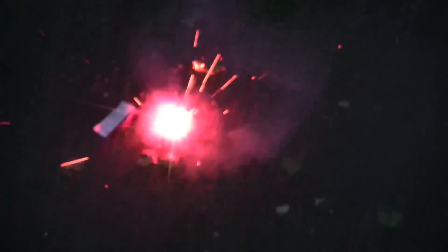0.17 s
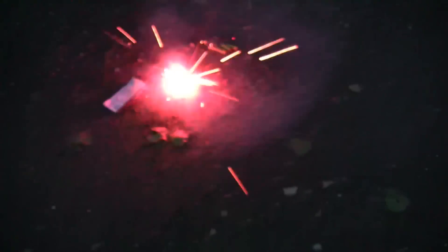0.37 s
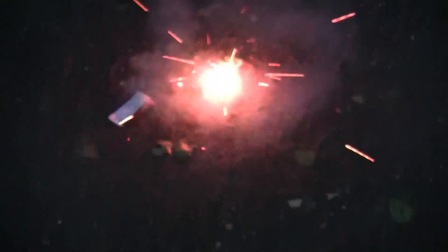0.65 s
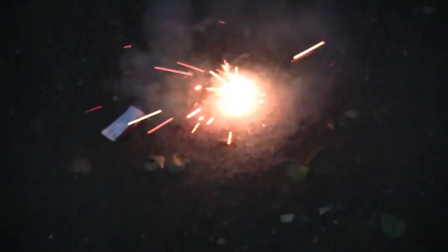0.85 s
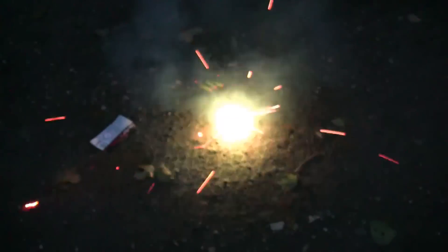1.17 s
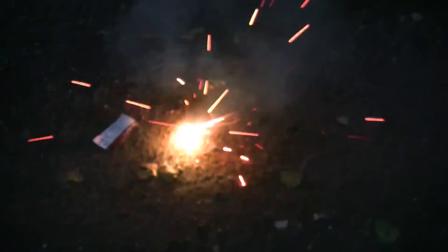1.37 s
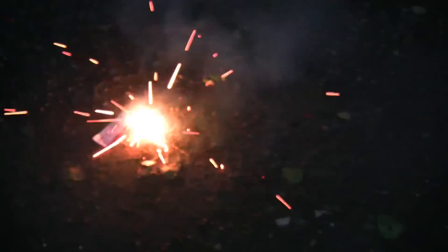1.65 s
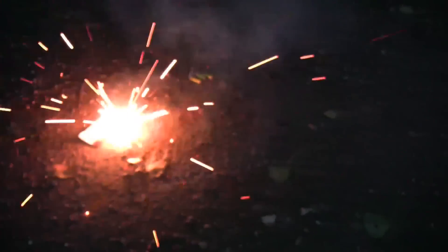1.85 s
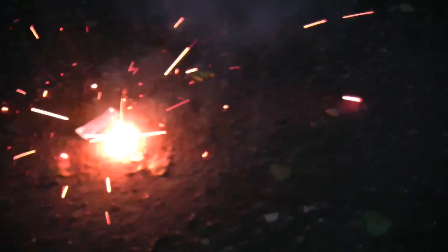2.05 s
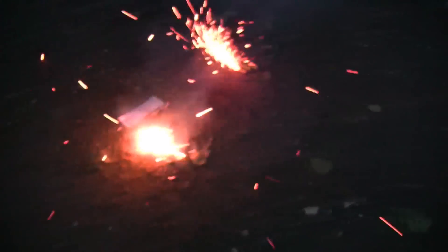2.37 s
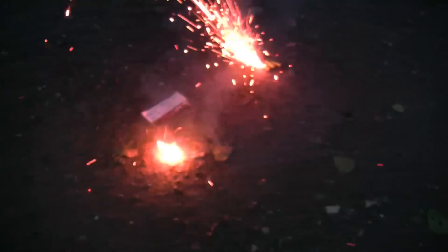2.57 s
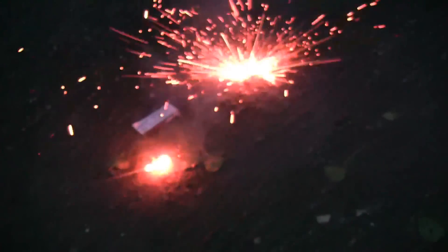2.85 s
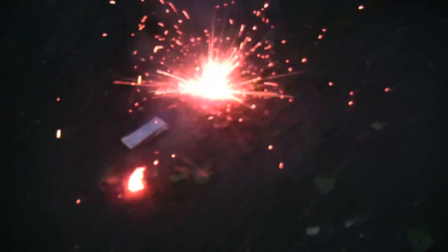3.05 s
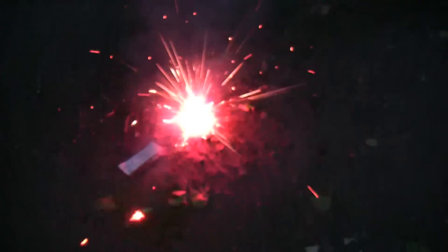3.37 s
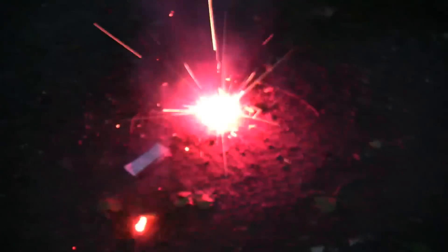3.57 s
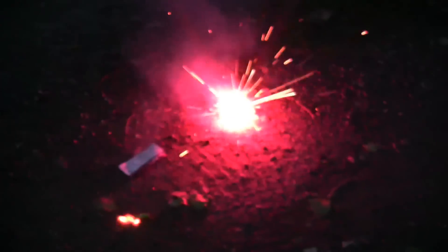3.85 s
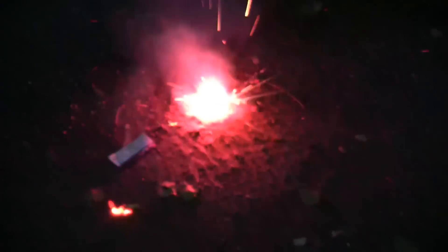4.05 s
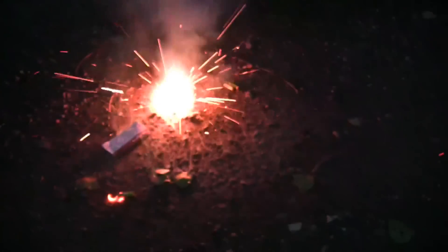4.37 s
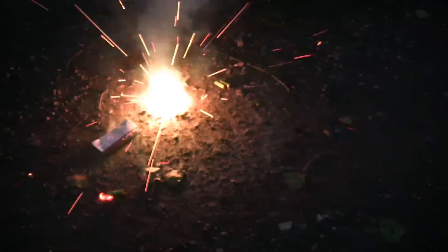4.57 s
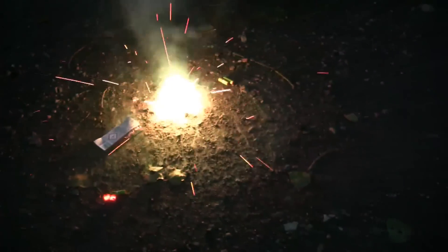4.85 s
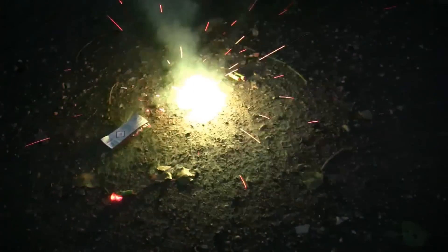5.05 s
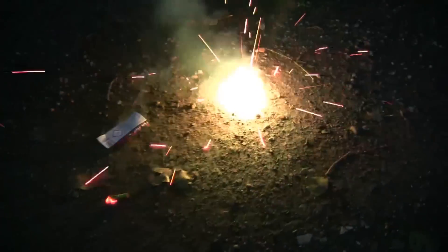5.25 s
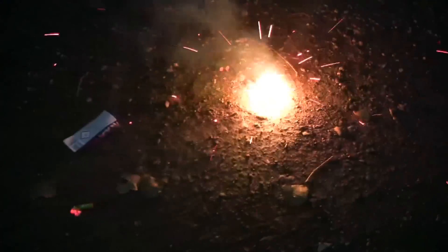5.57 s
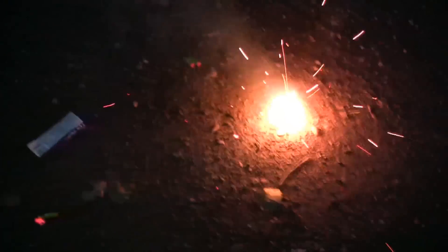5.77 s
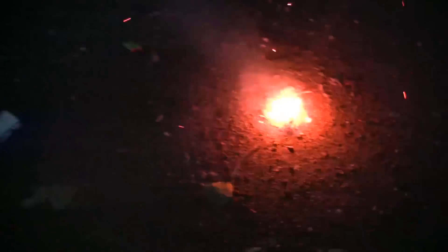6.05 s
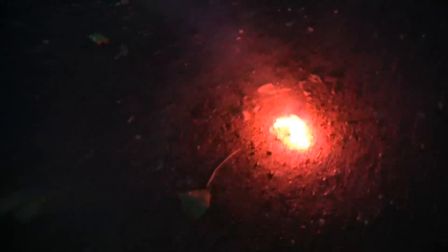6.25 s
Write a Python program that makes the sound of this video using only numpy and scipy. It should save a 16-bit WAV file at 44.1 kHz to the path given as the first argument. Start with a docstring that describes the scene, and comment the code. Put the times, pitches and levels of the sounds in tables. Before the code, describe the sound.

A ground spinner firework hisses and crackles on asphalt, with a fluttering roar, a low wavering hum and sharp pops.

```python
"""A ground spinner firework whirls on asphalt outdoors, a couple of metres from a hand-held phone.
Its nozzle jet hisses and crackles, and the whirling tube hums at its turning rate. The charge burns
unevenly, chuffing in bouts of quick gas puffs and letting off sharp pops; three times the nozzle clears
with a swoosh. Near the end the jet loses its edge and turns into a sputtering roar."""
import sys
import numpy as np
from scipy import signal
from scipy.fft import rfft, irfft, next_fast_len
from scipy.io import wavfile
from scipy.ndimage import uniform_filter1d

SR = 44100
rng = np.random.default_rng(int(sys.argv[2]) if len(sys.argv) > 2 else 0)


def to_wav(sig):
    """Store sig (one row per channel, or 1-D mono) as 16-bit WAV at the path in sys.argv[1].

    Samples outside -1..1 are clipped; the rate is SR.
    """
    pcm = np.clip(np.atleast_2d(sig), -1, 1) * 32767
    pcm = np.round(pcm).astype(np.int16)
    wavfile.write(sys.argv[1], SR, pcm.T)  # frames by channels


N = 282813

# tone colours of the jet's hiss, the flame's roar and a gas puff: frequency_hz, gain_db
HISS_EQ = [(2800, -28.5), (4300, -7.5), (5400, 0.5), (6600, -1), (7400, -4), (8200, -12.5), (10000, -30)]
ROAR_EQ = [(25, -36), (60, -16.5), (120, -8), (230, -0.5), (310, -1), (420, -5), (540, -0.5), (800, -1.5),
           (1400, -0.5), (2300, -1.5), (3200, -9.5), (6000, -39)]
PUFF_EQ = [(25, -41), (60, -17.5), (95, -8.5), (135, -3), (185, 0), (255, 1), (330, -6), (420, -8.5),
           (700, -7.5), (980, -17.5), (1400, -16), (4000, -32), (12000, -46)]
# bouts of uneven burning: start_s, end_s, surge_db, puff_rate_hz
CHUFF_BOUTS = [(0, 0.111, -33, 95.2), (0.126, 0.387, -29.5, 105), (0.533, 0.617, -28.5, 101.9),
               (.801, 0.855, -28.5, 99), (1.039, 1.096, -29, 95), (1.109, 1.171, -31.5, 87.9),
               (1.184, 1.25, -26, 90.9), (1.471, 1.518, -29.5, 89.88), (1.665, 1.87, -29.5, 75.05),
               (2, 2.089, -28, 73), (2.2, 2.282, -29.5, 76.03), (2.38, 2.721, -31.5, 79.97),
               (2.84, 3.32, -37, 87.1), (3.45, 3.52, -36.5, 94.1), (3.735, 3.771, -36, 98.15),
               (3.879, 3.926, -35, 99.6), (4.139, 4.165, -35.5, 104), (4.221, 4.34, -36.5, 106.1),
               (4.454, 4.485, -28.5, 110.1), (4.595, 4.78, -37.5, 105), (4.86, 5.001, -34.5, 96.9),
               (5.13, 5.156, -28, 90), (5.56, 5.58, -36, 80), (5.611, 5.672, -31.5, 75.1),
               (5.703, 5.729, -33, 75), (5.909, 5.972, -37, 69.9), (6.05, 6.12, -35.5, 70),
               (6.19, 6.26, -29.5, 70), (6.28, 6.366, -33, 65.1)]
FULL_BOUT_DB = -25  # the surge that counts as a full bout
FULL_SPIN_HZ = 135.4


def undb(db):
    """Decibels to gain."""
    return 10 ** (np.asarray(db) / 20)


def unit(x):
    """Scale to rms 1."""
    return x / np.sqrt(np.mean(x ** 2))


def curves(table):
    """Automation lanes: each column after the first, joined by straight lines in time."""
    times_s, *columns = np.transpose(table)
    return [np.interp(np.arange(N) / SR, times_s, column) for column in columns]


def colour(x, eq):
    """Causal EQ through (frequency_hz, gain_db) points, falling 10 dB an octave beyond both ends."""
    size = 2 * next_fast_len(N // 2 + 4096)
    hz, db = np.transpose(eq)
    octave = np.log2(np.maximum(np.arange(size // 2 + 1) * SR / size, 10))
    knots = np.log2(hz)
    beyond = abs(octave - np.clip(octave, knots[0], knots[-1]))
    cepstrum = irfft(np.log(undb(np.interp(octave, knots, db) - 10 * beyond)))
    cepstrum[1:size // 2] *= 2  # fold to minimum phase
    cepstrum[size // 2 + 1:] = 0
    return irfft(rfft(x, size) * np.exp(rfft(cepstrum)))[..., :N]


def walk(hz):
    """Random wandering with spread 1, up to about hz changes a second."""
    pole = np.exp(-2 * np.pi * hz / SR)
    return unit(signal.lfilter([1], [1, -2 * pole, pole ** 2], rng.standard_normal(N)))


def decay(kicks, life_s):
    """Each kick dies away exponentially."""
    return signal.lfilter([1], [1, -np.exp(-1 / (life_s * SR))], kicks)


def burning_grains(per_s, spread_db, life_s):
    """Power of burning grains: each flares at a random moment and dies away; mean 1."""
    ignites = rng.random(N) < per_s / SR
    size = undb(spread_db * np.minimum(rng.exponential(size=N), 4))
    power = decay(ignites * size ** 2, life_s)
    return power / power.mean()


def eddies(drive, eq, graininess):
    """Jet noise of one eddy size, riding the drive with its own flicker and grains; mid and side."""
    grains = burning_grains(per_s=900, spread_db=3.0, life_s=0.00068)
    strength = drive * np.sqrt(1 + graininess * grains) * undb(walk(73))
    return unit(colour(rng.standard_normal((2, N)) * strength, eq))


def jet_hiss(throb, flare, flutter, chuffing, hiss_dip_db=1.95, skirt_lift_db=5):
    """The nozzle jet, rough with burning grains; the hiss dips and dulls in each bout; mid and side."""
    # the jet's level, and its low and high bands against it: time_s, hiss_db, skirt_db, sizzle_db
    jet_levels = [(0, -24.5, -6.5, 1), (0.45, -23.0, -6.5, 0), (0.85, -25.5, -6.5, -1), (1.4, -21, -7, -2),
                  (1.95, -24, -3.5, -0.5), (2.45, -23, -4.5, -2.5), (2.7, -20, -6, -3.5),
                  (3.05, -26.5, -6, 1.0), (3.5, -27.5, -4.5, 4.0), (3.72, -20.5, -8.5, -1.5),
                  (4.1, -23.5, -6.5, 1.0), (4.75, -22, -5, -2.0), (5.25, -20.5, -5, -4.5),
                  (5.75, -21.5, -4, -4.5), (6.1, -25.5, -2, -6.5), (6.28, -27, -2, -10.5),
                  (6.41, -35, 0, -8.5)]
    # the bands below and above the core of the hiss: frequency_hz, gain_db
    skirt_eq = [(1300, -21), (2300, -2.5), (3000, -1.5), (4000, -0.5), (4700, -2), (6000, -22.5)]
    sizzle_eq = [(6500, -16), (8200, -3), (9400, 0), (10800, 0.5), (12500, -5), (14500, -4.5),
                 (16000, -10.5)]
    hiss_db, skirt_db, sizzle_db = curves(jet_levels)
    drive = throb * np.sqrt(1 + 0.01 * flare / flare.mean()) * undb(0.77 * flutter + 0.36 * walk(7))
    # sparks spit mostly in the treble
    spit = np.sqrt(1 + 0.3 * burning_grains(per_s=700, spread_db=3.5, life_s=0.00078))
    skirt = eddies(drive, skirt_eq, graininess=1.0) * undb(skirt_db + skirt_lift_db * chuffing)
    core = eddies(drive * spit, HISS_EQ, graininess=0.64)
    sizzle = eddies(drive * spit, sizzle_eq, graininess=0.58) * undb(sizzle_db + 1.47)
    return (skirt + core + sizzle) * undb(hiss_db - hiss_dip_db * chuffing)


def flame_roar(throb, flare, flutter, reflection_gain=0.21):
    """The flame's low turbulence, ragged and full of small shock cracks; each puff adds a spurt."""
    # the flame's swell, rising in the tube's leap near 3 s and as the charge runs out: time_s, level_db
    flame_swell = [(0, -32), (.75, -36.5), (2.1, -31), (2.5, -28), (3.1, -27.5), (3.25, -33.5),
                   (4.3, -35.5), (5.1, -31.5), (5.23, -38.5), (5.6, -30.5), (5.95, -30), (6.1, -25),
                   (6.355, -23), (6.375, -36.5), (6.4, -22)]
    # an early reflection hollows the roar; in the leap its path shortens and a throaty note rises:
    # time_s, delay_ms, note_db
    reflection = [(2.75, 1.56, -51), (2.88, 1.95, -31), (3, 1.58, -36), (3.09, 1.42, -30),
                  (3.19, 1.42, -38), (3.3, 1.6, -67)]
    (swell_db,) = curves(flame_swell)
    delay_ms, note_db = curves(reflection)
    grains = burning_grains(per_s=150, spread_db=2.5, life_s=0.0039)
    ragged = unit(np.sqrt(0.7 + grains) * throb * undb(0.8 * flutter))
    strength = np.sqrt((ragged * undb(swell_db + 2.5)) ** 2 + undb(-5.5) * flare)
    cracks = (rng.random(N) < 500 / SR) * undb(3.4 * rng.standard_normal(N))
    gas = colour((rng.standard_normal(N) + undb(-7.5) * unit(cracks)) * strength, ROAR_EQ)
    n = np.arange(N)
    hollowed = gas + reflection_gain * np.interp(n - delay_ms * SR / 1000, n, gas)
    note = unit(walk(170) * np.cos(2 * np.pi * np.cumsum(1000 / delay_ms) / SR))
    return unit(hollowed) * np.sqrt(np.mean(strength ** 2)) + note * ragged * undb(note_db)


def puff_train(rate_sag=0.0801):
    """One kick of gas per cycle of the unsteady flame, slowing through each bout, loose in time and size."""
    # how unevenly the puffs come: time_s, timing_spread_periods, size_spread_db
    puff_scatter = [(1.25, .055, 2.5), (1.7, 0.12, 1), (2.6, 0.201, 2.5)]
    rate_points = []
    for start_s, end_s, _, hz in CHUFF_BOUTS:
        rate_points += [(start_s, hz * (1 + rate_sag)), (end_s, hz * (1 - rate_sag))]
    (rate_hz,) = curves(rate_points)
    timing_spread, size_spread_db = curves(puff_scatter)
    due = np.flatnonzero(np.diff(np.floor(np.cumsum(rate_hz) / SR)))
    timing_draw, size_draw = rng.standard_normal((1000, 2))[:len(due)].T
    onsets = np.clip(due + timing_draw * timing_spread[due] * SR / rate_hz[due], 0, N - 1).astype(int)
    train = np.zeros(N)
    train[onsets] = undb(size_spread_db[due] * size_draw) * np.sqrt(rate_hz.mean() / rate_hz[due])
    return train


def bout_surge(edge_s=0.03, rest_db=-52, stray_db=4.0):
    """The puffs' envelope: it swells into each bout, wavers and sinks; faint strays come between."""
    gain = undb(rest_db + stray_db * walk(9))
    for start_s, end_s, surge_db, _ in CHUFF_BOUTS:
        gain[int(start_s * SR):int(end_s * SR)] = undb(surge_db)
    edge = int(edge_s * SR)
    return uniform_filter1d(uniform_filter1d(gain, edge), edge) * undb(1.13 * walk(17))


def spin_hum(turn, spin_hz, chuffing, full_spin_db=-44, db_per_octave=15, bout_lift_db=4.5):
    """The jet pushes the air in a circle: a tone at the turning rate, roughened by unsteady thrust."""
    phase = turn + 0.27 * walk(18)
    overtone, undertone = np.sin(2 * phase), np.sin(0.75 * phase)
    tone = np.sin(phase) + undb(-11) * (overtone + undertone)
    level_db = full_spin_db + db_per_octave * np.log2(spin_hz / FULL_SPIN_HZ) + bout_lift_db * chuffing
    return unit(tone * undb(1.6 * walk(18))) * undb(level_db)


def charge_pops(crack_s=0.00055, bark_s=0.0011):
    """Lumps of the charge go off: each a short bright crack, and a bark of gas on top of a low thump."""
    # each pop's kick, and its low end against that: start_s, kick_db, low_end_db
    pop_cues = [(.143, -9, -4), (.160, -3, -7), (.357, -9.5, 2), (1.065, 1, -11), (1.493, -11, 1),
                (1.777, -9, 3), (2.567, -10, -3), (2.892, -6, 1), (3.085, -9, -2), (3.194, -12, 1),
                (3.243, -11, -18), (4.013, -11, -24), (4.977, -9, 1), (5.647, -9, -6), (6.218, -4, -8),
                (6.332, -14.5, 4)]
    high_kicks, low_kicks = np.zeros((2, N))
    for start_s, kick_db, low_end_db in pop_cues:
        high_kicks[int(start_s * SR)] = undb(kick_db)
        low_kicks[int(start_s * SR)] = undb(kick_db + low_end_db)
    crack = colour(decay(high_kicks, crack_s) * rng.standard_normal(N), HISS_EQ)
    bark = colour(decay(low_kicks, bark_s) * rng.standard_normal(N), ROAR_EQ)
    thump = colour(low_kicks, PUFF_EQ)
    return undb(5.5) * crack + undb(6.5) * bark + undb(20) * thump


def nozzle_swooshes(high_hz=6300, low_hz=3100, width_hz=770, edge_s=0.015):
    """The nozzle clears after a bout: a broad resonance of the jet swoops down and back up."""
    # moments when the nozzle clears: start_s, length_s, level_db
    swoosh_cues = [(1.255, .235, -27), (5.14, .19, -26), (5.46, .12, -30)]
    gain, centre_hz = np.zeros(N), np.full(N, float(high_hz))
    t = np.arange(N) / SR
    for start_s, length_s, level_db in swoosh_cues:
        arch = np.sin(np.pi * np.clip((t - start_s) / length_s, 0, 1))
        centre_hz -= (high_hz - low_hz) * arch
        gain += undb(level_db) * np.clip(np.minimum(t - start_s, start_s + length_s - t) / edge_s, 0, 1)
    phase = 2 * np.pi * np.cumsum(centre_hz) / SR
    return unit(walk(width_hz) * np.cos(phase) + walk(width_hz) * np.sin(phase)) * gain


def microphone_ports(mid, jet_side):
    """The phone's two ports resonate a little differently, so level and phase part in the treble."""
    # stereo width of the hiss: frequency_hz, side_gain_db
    side_eq = [(4200, -77), (5800, -24), (7000, -3.5), (8200, -4), (9600, -11), (11000, -13.5),
               (13000, -3.5), (15500, -11)]
    # tilt between the ports: frequency_hz, left_minus_right_db
    port_balance = [(4000, 0), (6400, 0.5), (8000, -3.5), (9800, 4.5), (11500, 1.5), (15000, 0)]
    # phase between the ports: frequency_hz, left_lead_rad
    port_phase = [(6700, 0), (8100, 0.88), (8700, 0.097), (10200, 0), (12200, -0.1), (12800, -1.1),
                  (13600, -.4), (15600, 0)]
    side = colour(jet_side, side_eq)
    hz = np.arange(N // 2 + 1) * SR / N
    balance = undb(np.interp(hz, *np.transpose(port_balance)))
    lead_rad = np.interp(hz, *np.transpose(port_phase))
    half_tilt = np.sqrt(balance) * np.exp(0.5j * lead_rad)
    return np.array([irfft(rfft(mid + side) * half_tilt, N), irfft(rfft(mid - side) / half_tilt, N)])


def scene():
    """One small tube makes every layer; its spin and uneven burn tie them together."""
    # the tube's whirl, slowing in its leap near 3 s and as the charge runs out: time_s, spin_hz
    spin_curve = [(0, 108), (.7, 134), (1.05, 134), (1.3, 114), (1.45, 122), (1.65, 112), (2, 134),
                  (2.6, 82), (2.92, 52), (3.27, 108), (3.45, 128), (3.7, 125), (4.25, 149), (4.9, 134),
                  (5.3, 92), (5.7, 112), (6.41, 60)]
    (spin_hz,) = curves(spin_curve)
    turn = 2 * np.pi * np.cumsum(spin_hz) / SR
    # the jet sweeps past once a turn; a slower tube throbs deeper
    throb = 1 + 0.14 * FULL_SPIN_HZ / spin_hz * np.cos(turn)
    puffs, surge = puff_train(), bout_surge()
    chuffing = np.minimum(surge / undb(FULL_BOUT_DB), 1)
    chuffs = unit(colour(puffs, PUFF_EQ)) * surge * undb(3.0)
    # every puff drives the flame harder for a few milliseconds
    puff_power = decay(puffs ** 2, life_s=0.0023)
    flare = puff_power / puff_power.mean() * surge ** 2
    flutter = walk(50)
    hiss, hiss_side = jet_hiss(throb, flare, flutter, chuffing)
    swooshes = nozzle_swooshes() * throb
    roar = flame_roar(throb, flare, flutter)
    hum = spin_hum(turn, spin_hz, chuffing)
    return microphone_ports(hiss + roar + chuffs + hum + charge_pops() + swooshes, hiss_side)


def record(dry, cutoff_hz=15700):
    """The phone clips at full scale and cuts the top."""
    lowpass = signal.ellip(10, 0.2, 80, cutoff_hz, fs=SR, output="sos")
    return signal.sosfilt(lowpass, np.clip(dry, -1, 1))


dry = scene()
out = record(dry)
to_wav(out)
```